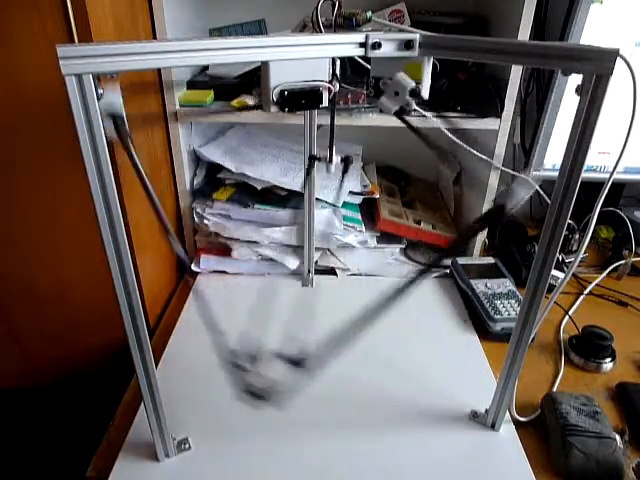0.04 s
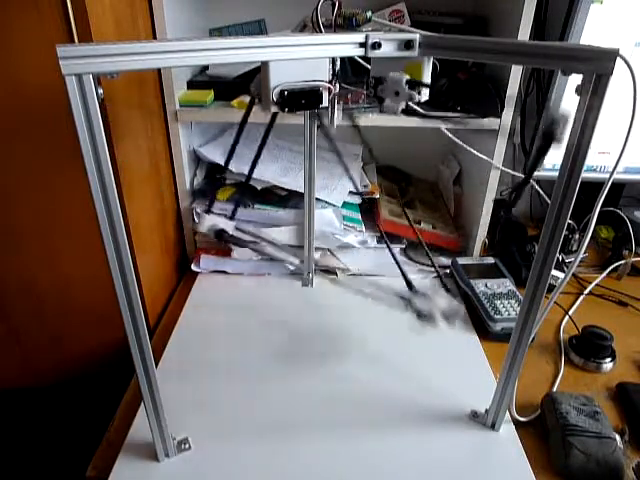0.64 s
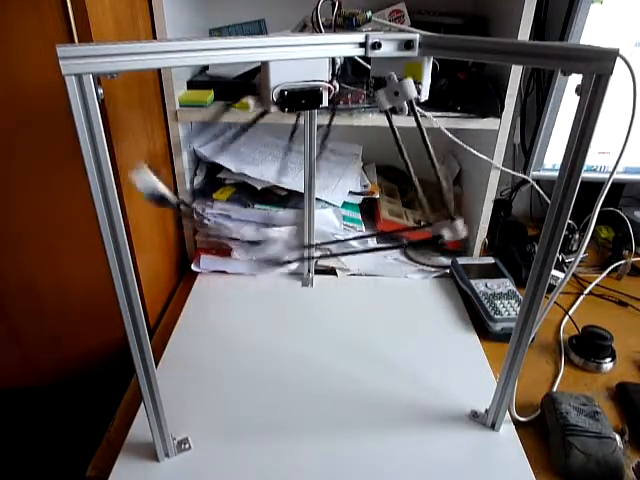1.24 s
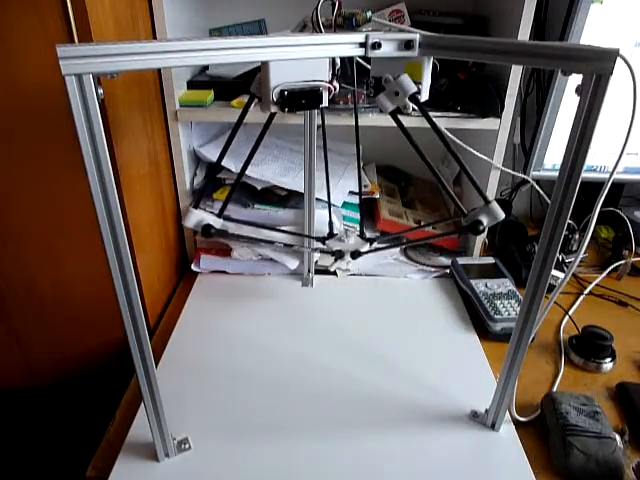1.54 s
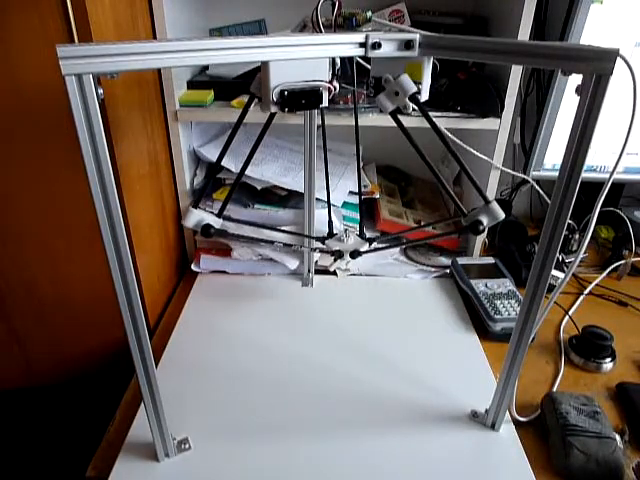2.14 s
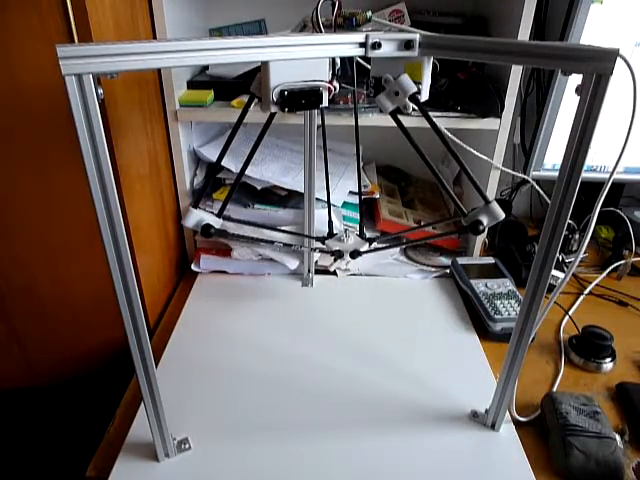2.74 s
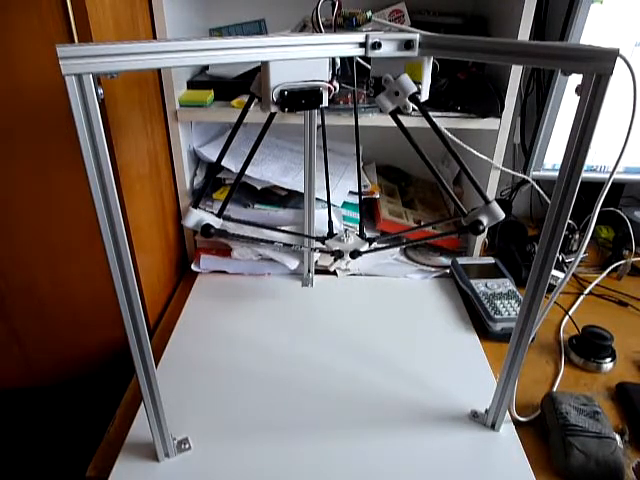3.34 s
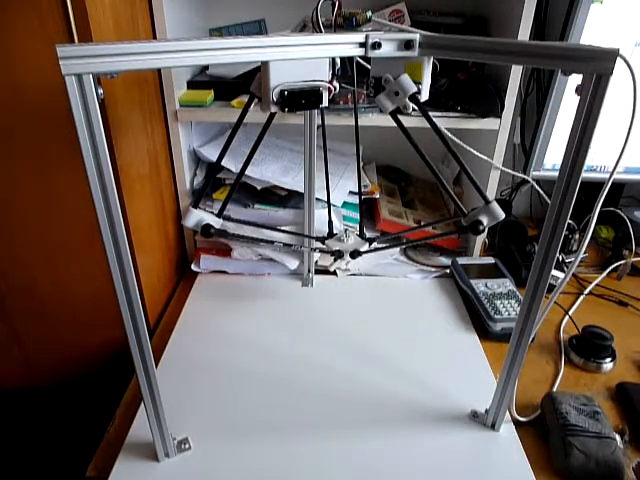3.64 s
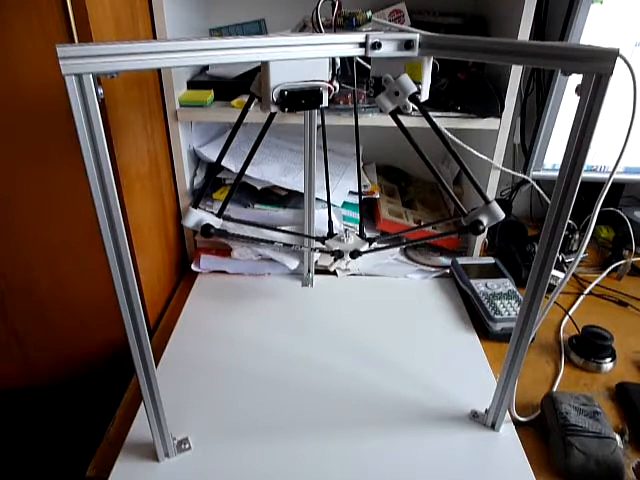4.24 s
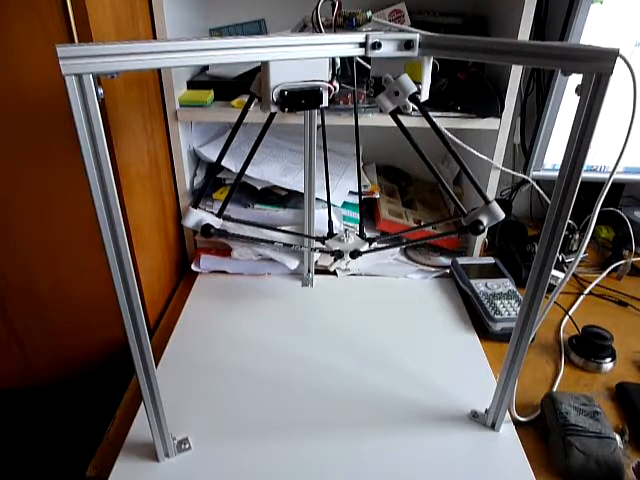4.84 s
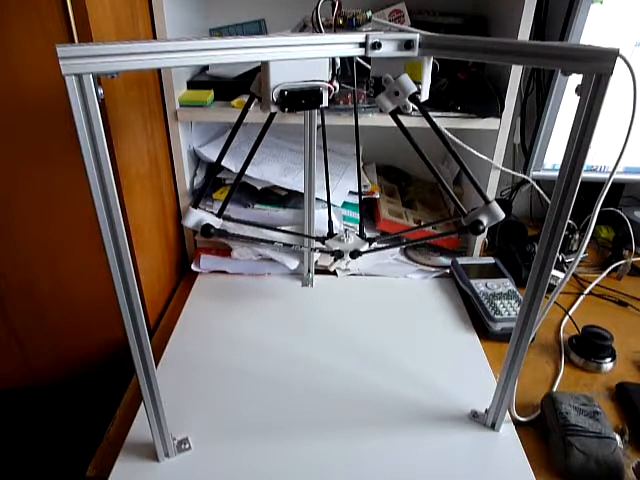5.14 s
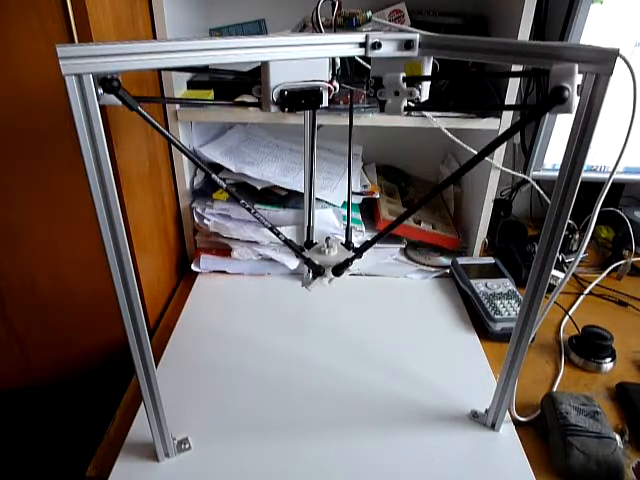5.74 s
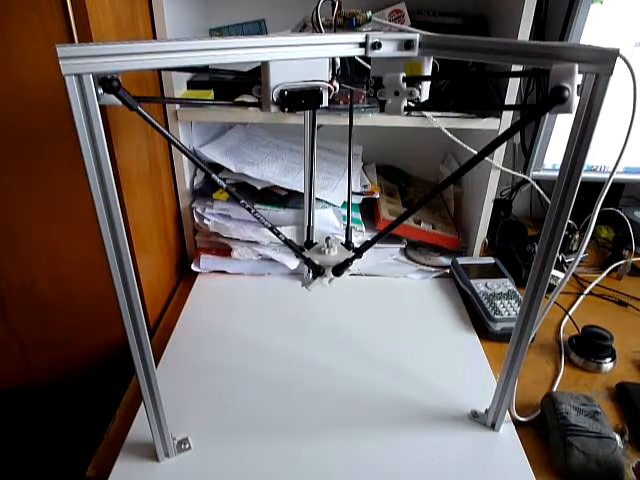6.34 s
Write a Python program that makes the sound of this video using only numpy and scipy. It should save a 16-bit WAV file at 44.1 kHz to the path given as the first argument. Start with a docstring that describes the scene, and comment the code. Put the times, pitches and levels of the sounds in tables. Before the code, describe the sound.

A desktop robot's geared motors buzz and rasp rapidly, settle into a faint ticking hum, then briefly whir again.

```python
"""Geared servo motors fling a desktop delta robot's arms about, hold still, then make one last quick lift.
Gear teeth whine and rattle in the small casings and shake the frame. At rest the drive pulses sing
faintly in the windings and the gears tick now and then, over the hush of a small room."""
import sys
import numpy as np
from scipy import signal
from scipy.fft import rfft, irfft, next_fast_len
from scipy.io import wavfile
from scipy.ndimage import uniform_filter1d

SR = 44100
rng = np.random.default_rng(int(sys.argv[2]) if len(sys.argv) > 2 else 0)


def bounce(signal):
    """Save signal as a 16-bit WAV file at the path given by the first command-line argument."""
    frames = np.transpose(np.atleast_2d(signal))
    limited = np.clip(frames, -1, 1)
    pcm = np.round(limited * 32767).astype(np.int16)
    wavfile.write(sys.argv[1], SR, pcm)


N = 281338
TIME = np.arange(N) / SR


def arms(whine_db=4.5, rasp_db=-34, shudder_db=-53):
    """Three gear trains ring their casings, rasp and shake the frame; jolts rattle the slack gears."""
    # whine of servos A, B (9 pinion teeth, 6 commutator steps a turn): rotor order, level/dB
    bright_orders = [(9, -6), (18, 3), (27, -4), (36, -5.5), (6, -7), (12, -9), (30, -1.5)]
    # lower, rounder whine of servo C: rotor order, level/dB
    round_orders = [(9, 2), (18, 4), (27, -3), (36, -10)]
    # casing response: f/Hz, level/dB
    casing = [(400, -30), (1000, -22), (1750, -15), (2100, -14), (2700, -10), (3100, -5), (3450, 0),
              (3700, -8), (3900, -14), (4500, -18), (5300, -13), (6000, -14), (6900, -16), (7400, -30),
              (8000, -45)]
    # rattle body: f/Hz, level/dB
    rattle_body = [(400, -39.5), (1000, -17), (2000, -11.5), (2500, -3.5), (2900, -1.5), (3300, -0.5),
                   (3700, -5), (4100, -12.5), (4600, -25.5), (6000, -16.5), (8000, -41)]
    # rattle treble: f/Hz, level/dB
    rasp_treble = [(3000, -14.5), (4200, -5), (4700, 0.5), (5300, 2), (5900, -5), (6300, -11.5),
                   (6900, -22), (7600, -17)]
    # frame response: f/Hz, level/dB
    frame = [(80, -11.5), (170, -9.5), (320, 4.5), (420, 0), (520, 8.5), (620, 2), (740, -5), (960, 8.5),
             (1250, -13.5), (1600, 3.5), (2200, -24.5)]
    servos = servo("A", bright_orders) + servo("B", bright_orders) + servo("C", round_orders)
    whine, rattle, rasp, speed = servos
    sway = jolts()
    whine = colour(whine * surges(), casing) * undb(whine_db)
    rattle = colour(rattle + sway * rng.standard_normal(N), rattle_body)
    rasp = colour(rasp, rasp_treble) * undb(rasp_db)
    rough_noise = rng.standard_normal(N) * undb(2.5 * walk(90))
    shudder = unit(colour(rough_noise, frame)) * (sway + speed * undb(shudder_db))
    return room(whine, t60_s=.29, wet_db=-3) + room(rattle + rasp + shudder, t60_s=.24, wet_db=-1.5)


def servo(name, orders, pinion_teeth=9, chatter=.015, knock_db=4, contact_periods=.22):
    """Meshing teeth whine, land and scrape. Returns whine, rattle, rasp, speed share."""
    tooth_hz, speed, whine_gain, rattle_gain = motion(name)
    # below full speed the load reverses and the teeth bounce across their play
    loose = np.clip((1650 - tooth_hz) / 400, 0, 1)
    flutter = .003 * walk(150)
    teeth = np.cumsum(tooth_hz * (1 + flutter + chatter * loose * walk(500))) / SR
    rotor_rad = 2 * np.pi * (teeth / pinion_teeth + rng.random())
    # the off-centre pinion presses the mesh once a turn
    throb = 1 + .45 * np.sin(rotor_rad + .7 * walk(50))
    pressure = throb * undb(1.5 * walk(450))
    whine = sum(undb(db + 3 * walk(45)) * np.sin(round(order) * rotor_rad) for order, db in orders)
    tooth_force = undb(knock_db * rng.uniform(-1, 1, N))[teeth.astype(int)]
    contact = np.exp(-(teeth % 1) / contact_periods)
    impacts = tooth_force * pressure * contact * rng.standard_normal(N)
    impacts /= np.std(impacts[speed > 0])
    rasp_rise_db = 4 * np.clip((tooth_hz - 1300) / 700, 0, 1)
    rasp = impacts * speed * undb(rasp_rise_db)
    return np.array([whine * pressure * whine_gain, impacts * rattle_gain, rasp, speed])


def motion(name, whine_kick_db=2.5, rattle_kick_db=4, ease_db_per_s=21):
    """A servo spins up, drifts with load, brakes. Returns tooth rate, speed share, whine, rattle gains."""
    # arm swings: t/s, length/s, spin-up/s, braking/s, top tooth rate/Hz, sag under load/(Hz/s),
    # whine level/dB, rattle level/dB, servo
    strokes = [ (-.2, 0.28, .12, .1, 1699, -1, -22, -20.5, "A"),
               (-.14, 0.32, 0.16, .11, 1916, -2, -37, -17, "B"),
               (.045, 0.35, .13, .11, 1738, 100, -29, -22, "A"),
               (0.159, .305, 0.15, .12, 1922, -0.5, -29.5, -17.5, "B"),
               (0.374, 0.34, 0.098, 0.049, 1740, 901.5, -28.5, -17, "A"),
               (0.451, .315, .17, .14, 1975, 4, -30, -23.5, "B"),
               (0.661, .32, 0.14, .09, 1651, -1.5, -32.5, -23, "A"),
               (0.712, .26, .07, .06, 1783, 749.5, -28.5, -28, "C"),
               (0.754, .294, .15, .107, 1916, -3, -33.5, -18, "B"),
               (0.939, 0.42, 0.15, 0.17, 1757, 599.5, -29, -20.5, "A"),
               (1.059, 0.26, .14, 0.078, 1922, -4.5, -27.5, -18, "B"),
               (5.17, .288, .155, .04, 1655, -300, -28, -18, "A"),
               (5.181, .272, .12, .032, 1720, -500, -27.5, -22.5, "C")]
    swings = []
    for start_s, length_s, spin_s, brake_s, top_hz, sag, whine_db, rattle_db, owner in strokes:
        if owner != name:
            continue
        age_s = TIME - start_s
        spun = ramp(age_s / spin_s)
        speed = np.sqrt(spun * ramp((length_s - age_s) / brake_s))
        running_s = np.clip(age_s - spin_s, 0, length_s)
        tooth_hz = speed * (top_hz - sag * running_s)
        torque = np.sqrt(1 - spun ** 2)
        gain = speed ** 1.02
        # starting torque lifts both; at speed the load eases and the whine fades
        whine = gain * undb(whine_db + whine_kick_db * torque - ease_db_per_s * running_s)
        rattle = gain * undb(rattle_db + rattle_kick_db * torque)
        swings.append((tooth_hz, speed, whine, rattle))
    return np.max(swings, axis=0)


def surges():
    """Whine gain: a short flat-topped swell as an arm snatches at its gears."""
    # snatches: t/s, half-width/s, level/dB
    snatches = [(0.575, 0.0057, 11), (0.701, 0.042, 5.5), (0.857, .042, 5.5), (0.983, 0.01, 6.5),
                (1.298, 0.013, 7.5), (5.308, 0.04, 3.5), (5.413, 0.018, 2.5)]
    return undb(sum(db * np.exp(-((TIME - at_s) / half_s) ** 4) for at_s, half_s, db in snatches))


def jolts(rise_s=.017, fade_s=.072):
    """Envelope of the frame's sway as the arms start, turn and settle."""
    # jolt peaks: t/s, level/dB
    peaks = [(.03, -45.5), (.41, -45.5), (0.699, -43.5), (.98, -45.5), (1.275, -37.5), (1.4, -43),
             (1.5, -47.5), (5.189, -37), (5.436, -40.5), (5.535, -39)]
    sway = np.zeros(N)
    for at_s, db in peaks:
        age_s = TIME - at_s
        sway += undb(db) * ramp(1 + age_s / rise_s) * np.exp(-np.maximum(age_s, 0) / fade_s)
    return sway


def hum(drive_hz=498.2, fade_s=.0085, waver_db=-.02):
    """Drive pulses sing in the windings; their width, and so their colour, changes with each pose."""
    # held poses: t/s, length/s, level/dB, centre f/Hz, width/Hz
    holds = [(1.328, .135, -46.5, 1282, 420), (1.418, 0.26, -45, 1014, 290), (1.449, .24, -47.5, 1562, 380),
             (1.68, 3.51, -48.5, 1510, 570), (5.43, .125, -46.5, 1133, 380),
             (5.593, 0.11, -47.5, 1520, 300)]
    # upper drive tones: harmonic, level/dB re harmonic 5
    upper_tones = [(7, -15), (10, -17), (12, -18)]
    harmonics = np.arange(1, 6)
    gains = 0
    for start_s, length_s, db, centre_hz, width_hz in holds:
        inside_s = np.minimum(TIME - start_s, start_s + length_s - TIME)
        gate = np.clip(inside_s / fade_s + .5, 0, 1)
        spectrum = np.exp(-.5 * ((harmonics * drive_hz - centre_hz) / width_hz) ** 2)
        gains = np.maximum(gains, undb(db) * np.outer(spectrum, gate))
    partials = list(zip(harmonics, gains))
    partials += [(round(k), gains[-1] * undb(db)) for k, db in upper_tones]
    phase = 2 * np.pi * drive_hz * TIME
    # the casing delays each harmonic differently, smearing the pulses into a smooth tone
    tone = sum(gain * np.sin(k * phase + np.pi * k * k / 2) for k, gain in partials)
    return np.sqrt(2) * tone * undb(waver_db * walk(14))


def ticks(gain_db=-9, fade_s=.018, ring_hz=4200, ring_s=.011):
    """A gear shifts across its play with a scratchy tick; the harder it lands, the more it rings."""
    # gear shifts: t/s, level/dB
    shifts = [(1.443, -41), (1.503, -44), (1.7247, -48), (2.234, -45), (2.316, -41.5), (2.5515, -42),
              (2.6566, -40.5), (3.13, -43.5), (3.2349, -40), (4.0426, -43), (4.1365, -41), (5.012, -44.5),
              (5.1356, -39)]
    # scratch spectrum: f/Hz, level/dB
    spectrum = [(1500, -17), (2900, 1), (3600, -0.5), (4200, 2.5), (4900, -0.5), (5600, -0.5), (7000, -6.5),
                (8000, -13)]
    scratch = unit(colour(rng.standard_normal(N), spectrum))
    out = np.zeros(N)
    for at_s, db in shifts:
        age_s = np.maximum(TIME - at_s, 0)
        ring = undb(db + 37) * np.exp(-age_s / ring_s) * np.sin(2 * np.pi * ring_hz * age_s)
        out += undb(db + gain_db) * (age_s > 0) * (scratch * np.exp(-age_s / fade_s) + ring)
    return room(out, t60_s=.23, wet_db=-4)


def hush(air_db=-49.5, drone_db=-59, drone_hz=(482.5, 517.5)):
    """Steady room air with a soft hollow drone."""
    # air spectrum: f/Hz, level/dB
    spectrum = [(25, -23.5), (50, -13.5), (75, -9), (110, -4.5), (170, -3), (260, -4), (410, -5), (540, -4),
                (650, -7.5), (960, -6), (1500, -10.5), (3000, -15.5), (5300, -24.5), (7000, -39.5)]
    air = unit(colour(rng.standard_normal(N), spectrum)) * undb(air_db + .3 * walk(4.9))
    band = signal.butter(1, drone_hz, "band", fs=SR)
    drone = unit(signal.lfilter(*band, rng.standard_normal(N))) * undb(drone_db)
    return air + drone


def room(x, t60_s, wet_db, gap_s=.0036):
    """Direct sound plus dense reflections off desk, shelves and walls."""
    t = TIME[:SR // 2]
    tail = rng.standard_normal(len(t)) * undb(-60 * t / t60_s) * (t > gap_s)
    wet = signal.fftconvolve(x, tail / np.sqrt(np.sum(tail ** 2)))[:N]
    return (x + undb(wet_db) * wet) / np.sqrt(1 + undb(2 * wet_db))


def colour(x, points):
    """Filter by (f/Hz, level/dB) points; 12 dB/octave skirt below the first."""
    hz, db = np.transpose(points)
    size = next_fast_len(N + SR // 10)
    f = np.maximum(np.fft.rfftfreq(size, 1 / SR), 1)
    skirt = np.minimum(f / hz[0], 1) ** 2
    response = skirt * undb(np.interp(np.log(f), np.log(hz), db))
    return irfft(rfft(x, size) * response, size)[:N]


def walk(rate_hz):
    """Smooth random wander, rms 1."""
    step = max(int(SR / rate_hz), 1)
    stairs = np.repeat(rng.standard_normal(N // step + 1), step)
    return unit(uniform_filter1d(stairs, step)[:N])


def ramp(share):
    """Quarter-sine rise from 0 to 1."""
    return np.sin(np.pi / 2 * np.clip(share, 0, 1))


def undb(db):
    """Decibels to gain."""
    return 10 ** (np.asarray(db) / 20)


def unit(x):
    """Scale to rms 1."""
    return x / np.sqrt(np.mean(x ** 2))


def scene():
    """The robot in its room, mono."""
    return (arms() + hum() + ticks() + hush())[None]


def record(dry, knee_db=-30, squeeze=.25, release_s=.8, top_hz=7200):
    """Gain control ducks under the motors and creeps back; the top is cut."""
    rms = np.sqrt(np.abs(uniform_filter1d(dry[0] ** 2, SR // 20))) + 1e-9
    # peak hold with exponential release
    held = np.exp(np.maximum.accumulate(np.log(rms) + TIME / release_s) - TIME / release_s)
    gain = (1 + (held / undb(knee_db)) ** 2) ** (-squeeze / 2)
    lowpass = signal.cheby1(12, .2, top_hz, fs=SR, output="sos")
    return signal.sosfilt(lowpass, dry * gain)


dry = scene()
out = record(dry)
bounce(out)
```